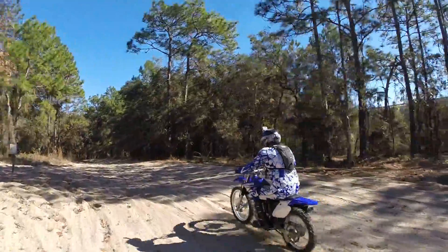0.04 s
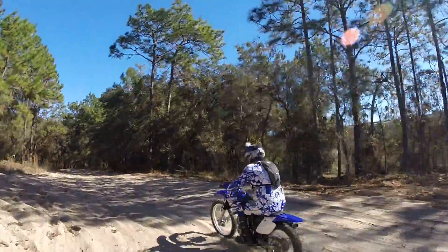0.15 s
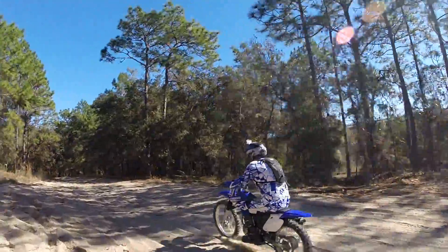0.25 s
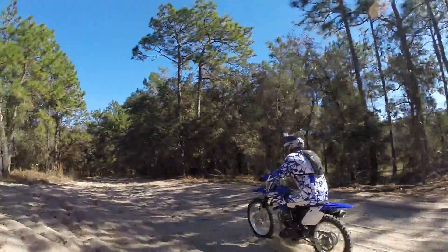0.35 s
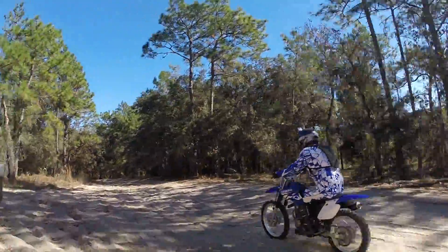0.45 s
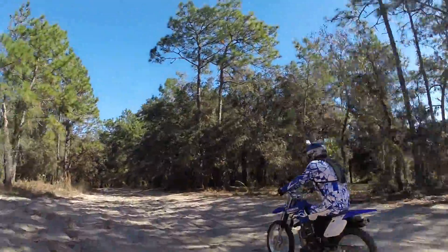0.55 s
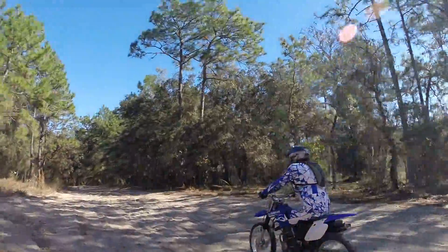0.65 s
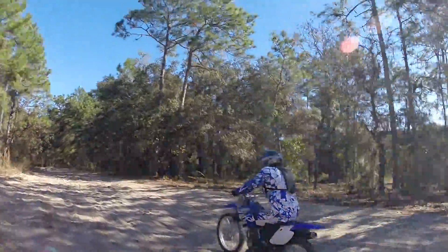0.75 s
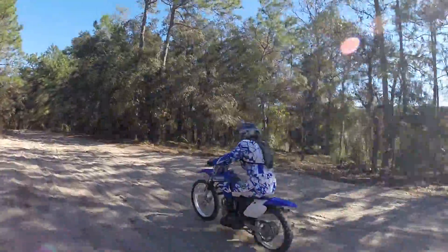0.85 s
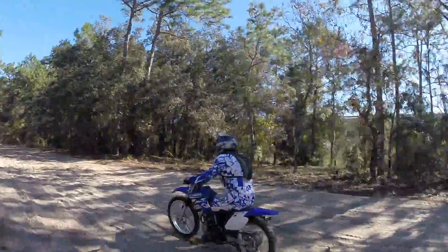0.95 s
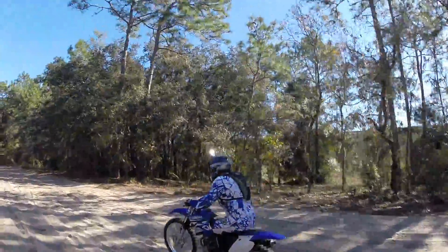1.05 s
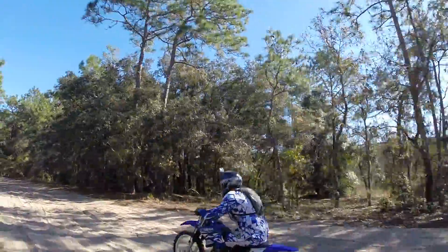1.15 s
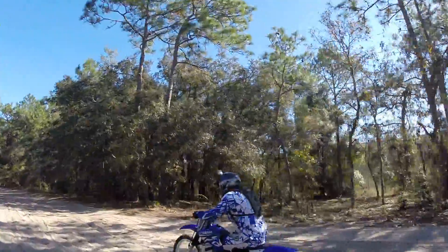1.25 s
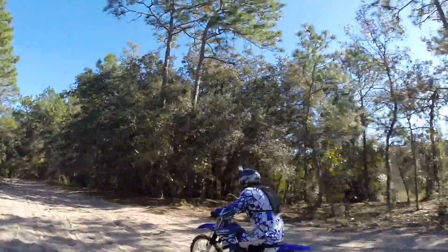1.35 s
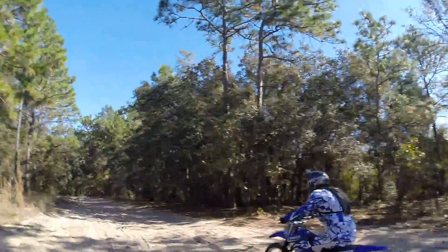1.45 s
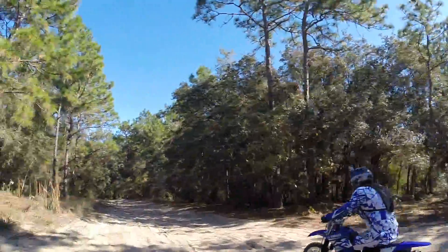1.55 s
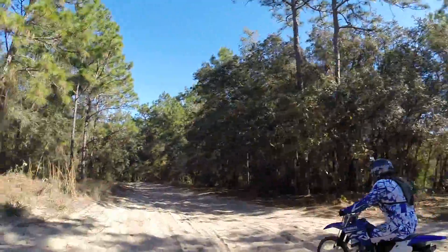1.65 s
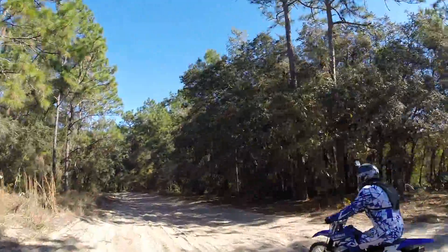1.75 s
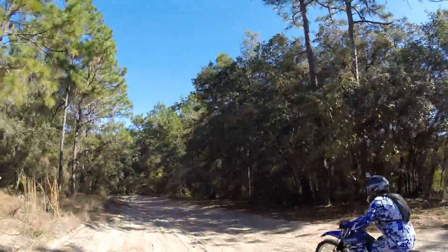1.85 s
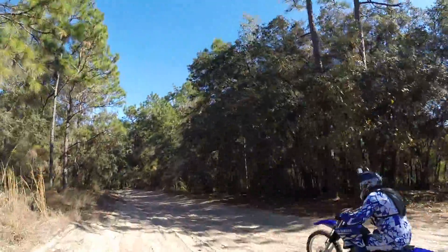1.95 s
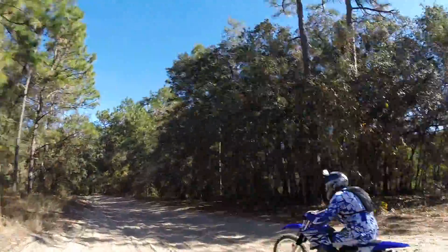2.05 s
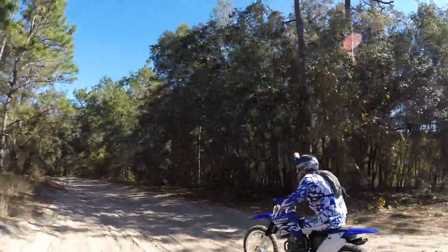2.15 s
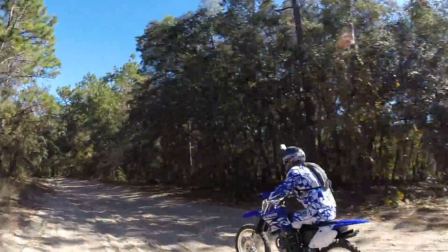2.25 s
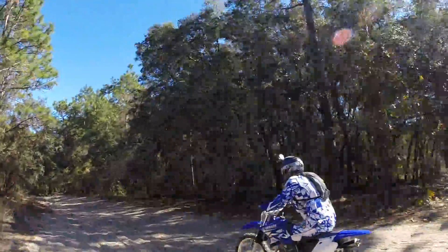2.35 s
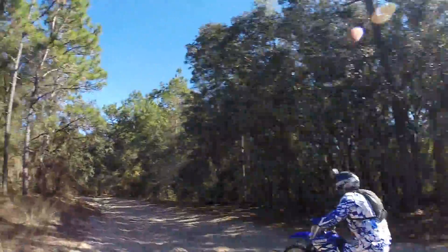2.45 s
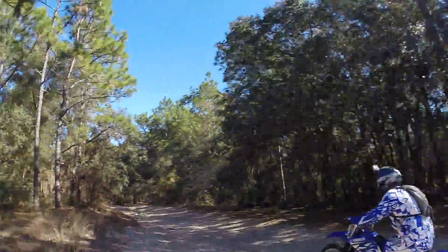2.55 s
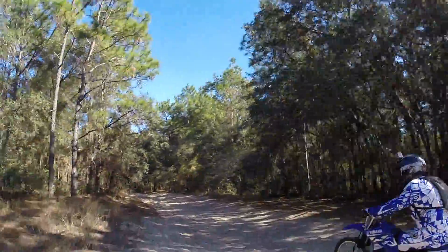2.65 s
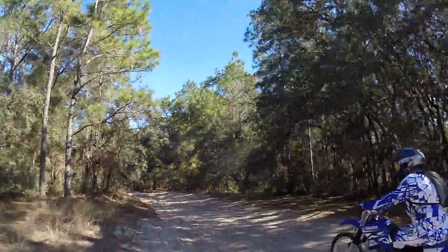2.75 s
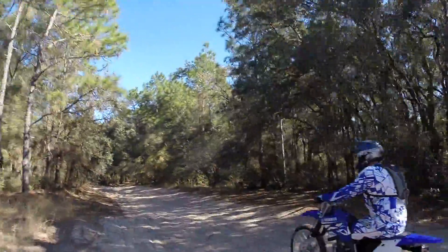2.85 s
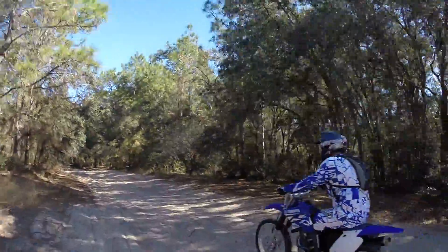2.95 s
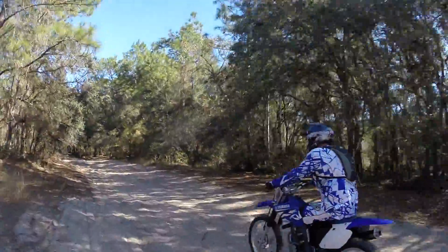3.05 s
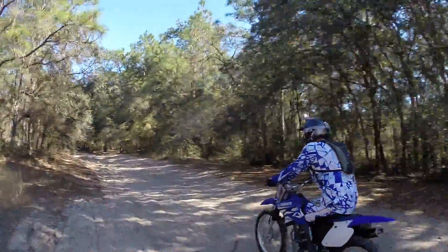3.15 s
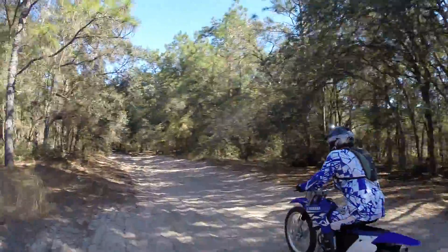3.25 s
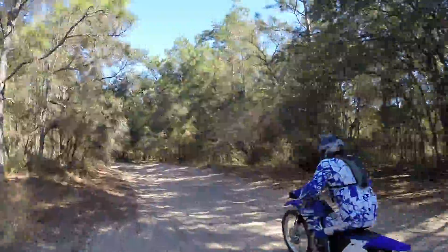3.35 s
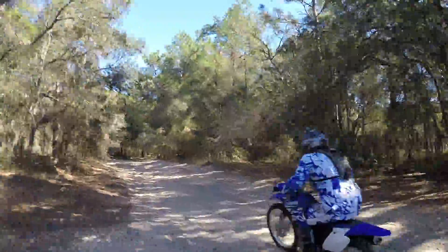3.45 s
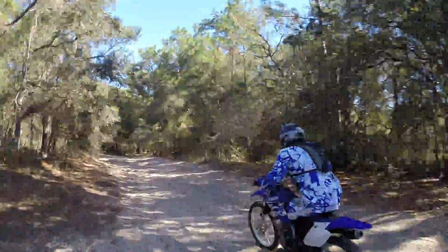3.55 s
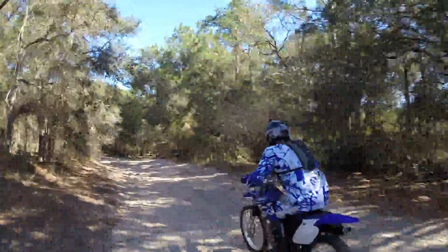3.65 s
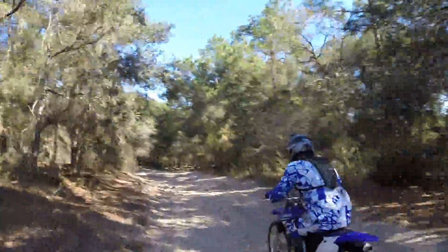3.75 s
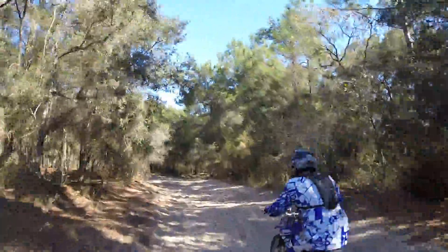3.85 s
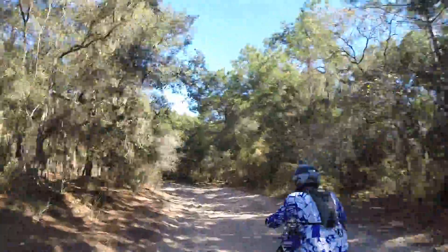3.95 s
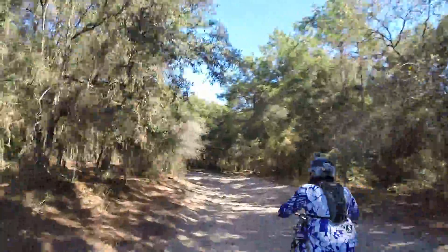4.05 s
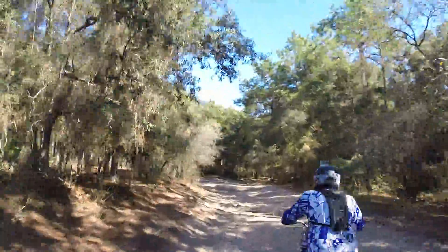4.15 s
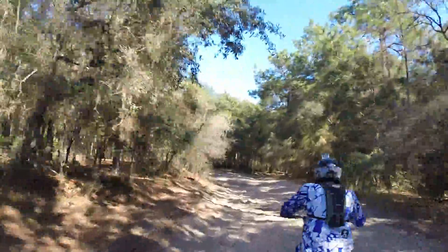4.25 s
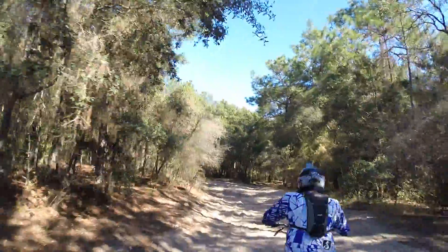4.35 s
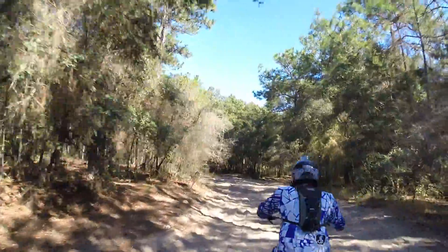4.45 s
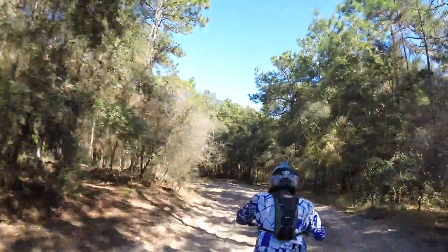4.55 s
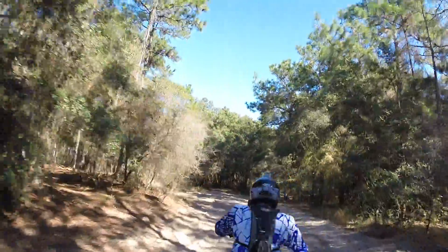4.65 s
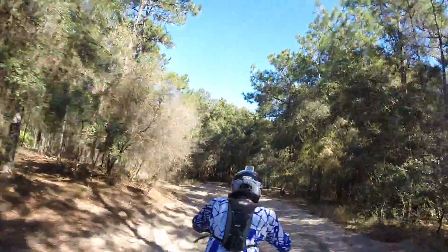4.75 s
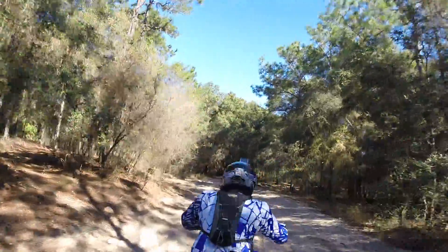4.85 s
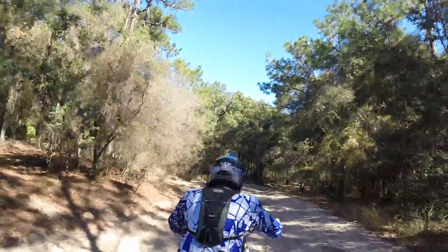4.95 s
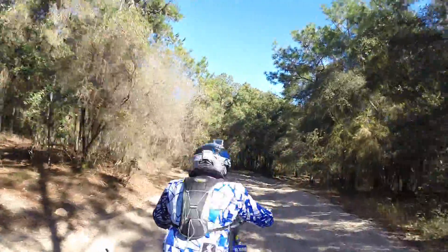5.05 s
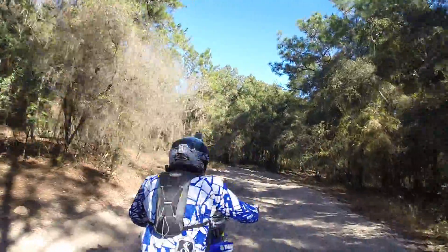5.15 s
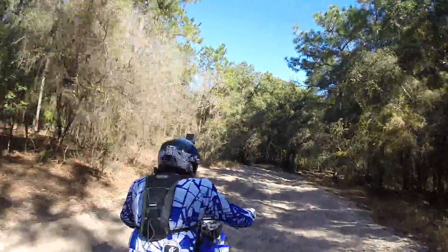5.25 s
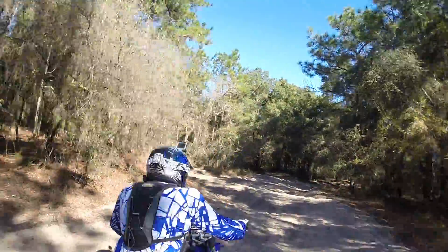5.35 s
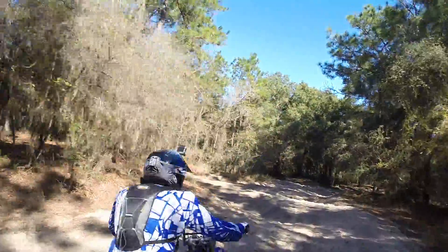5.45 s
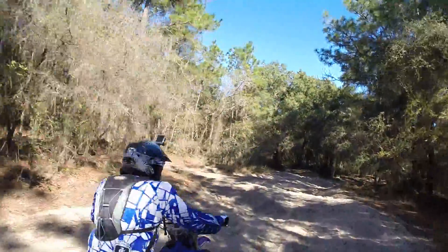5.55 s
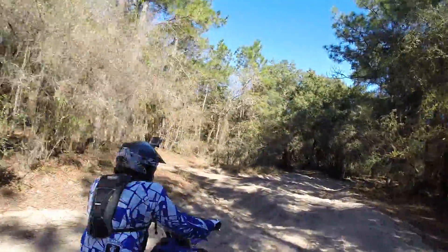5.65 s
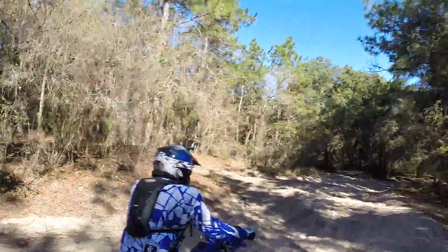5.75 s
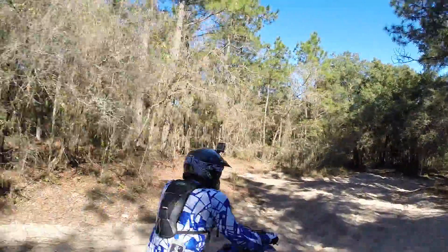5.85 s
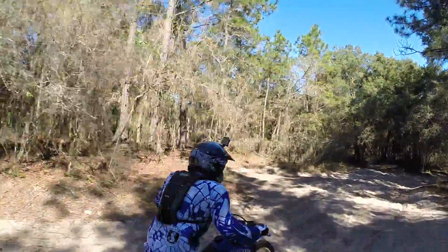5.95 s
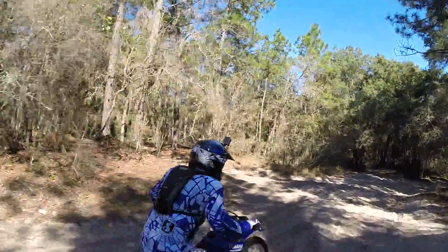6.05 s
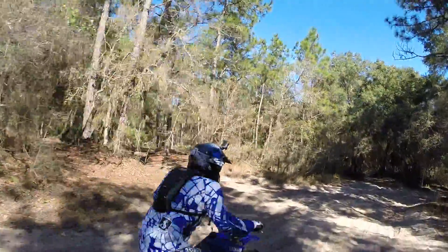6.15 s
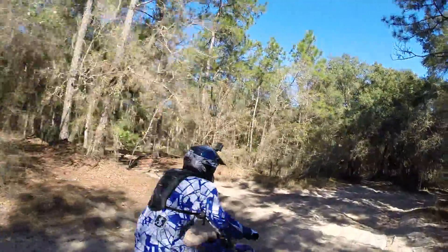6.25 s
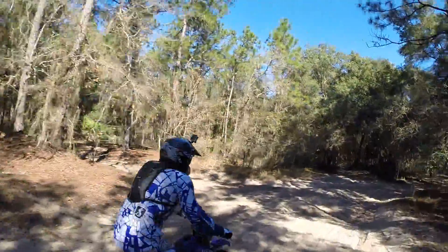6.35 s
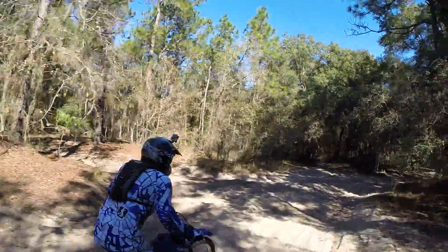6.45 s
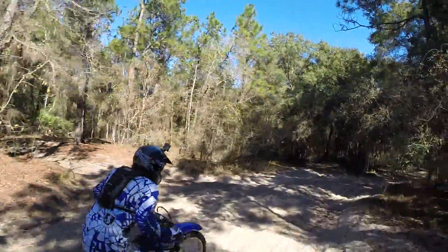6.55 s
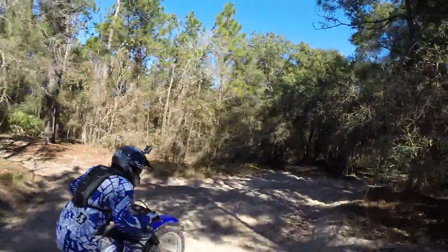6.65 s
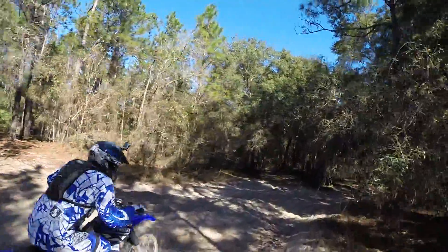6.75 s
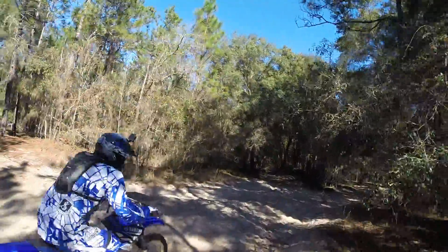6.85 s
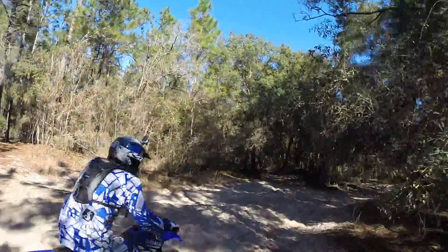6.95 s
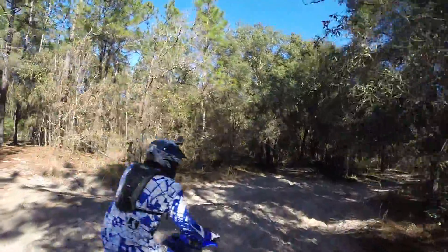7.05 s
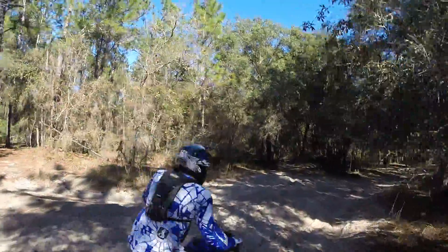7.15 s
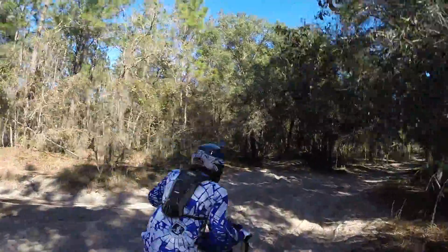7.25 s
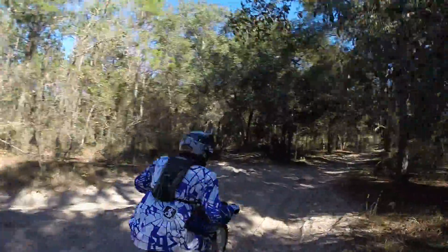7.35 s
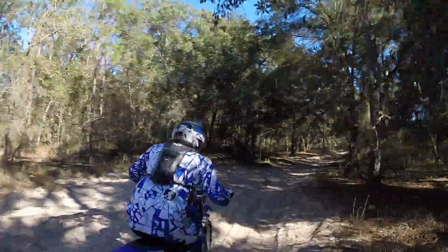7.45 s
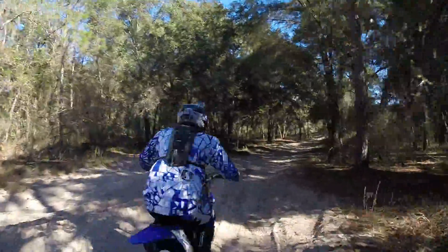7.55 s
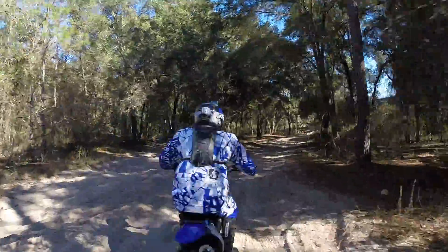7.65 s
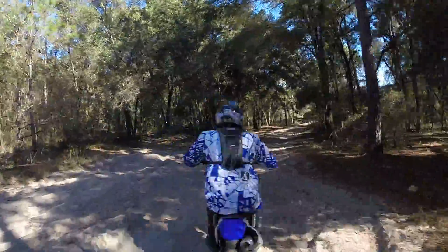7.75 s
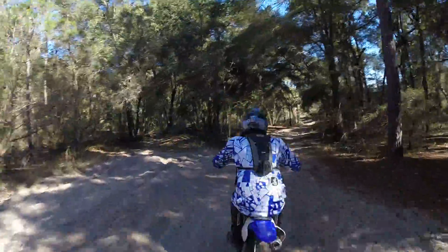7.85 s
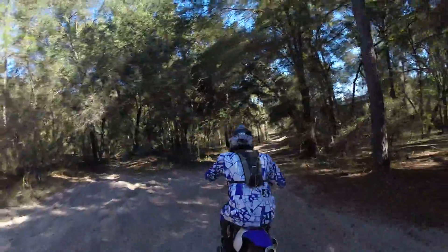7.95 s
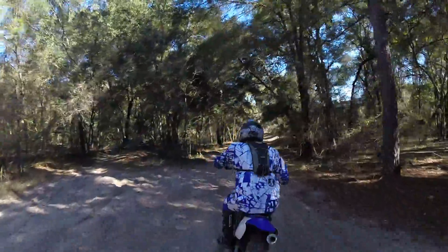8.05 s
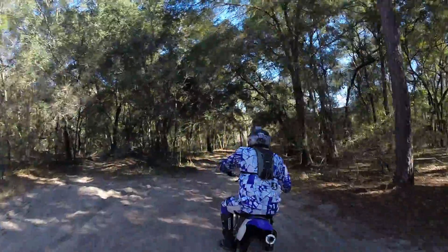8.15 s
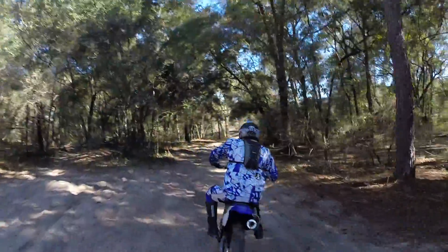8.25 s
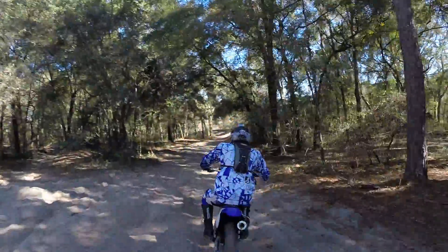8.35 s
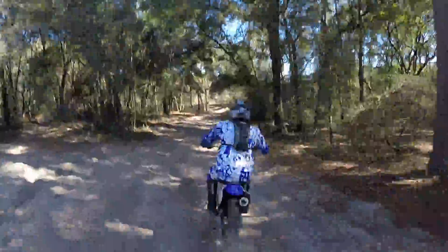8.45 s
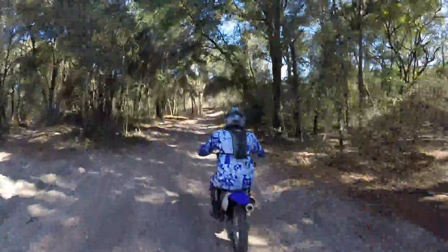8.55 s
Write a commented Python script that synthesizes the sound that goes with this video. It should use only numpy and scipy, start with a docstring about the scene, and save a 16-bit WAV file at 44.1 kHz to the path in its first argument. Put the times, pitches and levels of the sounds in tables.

```python
"""A helmet camera in its case rides a single-cylinder four-stroke dirt bike along a sandy trail.
It opens on two pulls of the throttle: each firing thumps the frame, booms in the silencer, growls and
barks, while the motor clatters and wind buffets the case. From 2.4 s the bike coasts and a second bike
drones faintly ahead. A third pull climbs from 3.5 to 4.8 s; then the revs sag, with two quick blips,
and the drone is back. The last pull starts at 7.4 s, with the hardest gust just after it."""
import sys
import numpy as np
from scipy import signal
from scipy.io import wavfile
from scipy.ndimage import uniform_filter1d

SR = 44100
rng = np.random.default_rng(int(sys.argv[2]) if len(sys.argv) > 2 else 0)


def store_pcm(level_fs):
    """Save levels as 16-bit WAV."""
    pcm = np.round(np.clip(level_fs, -1, 1) * 32767).astype(np.int16)
    wavfile.write(sys.argv[1], SR, np.atleast_2d(pcm).T)


N = 379687
T = np.arange(-SR // 10, N + SR // 10) / SR  # the engines run before time zero and past the end
M = len(T)
CRUISE_HZ = 35  # reference firing rate

# Engine speed, coasting and pull by pull. Each row: time in seconds, firing rate in Hz.
COAST_REVS = [(1.14, 35.77), (1.3, 35.54), (2.5, 35.03), (2.84, 31.22), (2.96, 36.33), (3.21, 32),
              (3.5, 29.02), (4.9, 39.42), (5.1, 33.44), (5.98, 31.3), (6.12, 34.08), (6.25, 33.23),
              (6.35, 34.9), (6.52, 29.52), (6.7, 28.02), (7.25, 26.82), (7.38, 25.64)]
PULL_REVS = [
    [(0.0, 41.52), (0.106, 41.9), (0.242, 43.6), (0.302, 44.65), (0.33, 43.5), (0.406, 42.2),
     (0.472, 42.12), (0.556, 42.7), (0.7, 42.9), (0.764, 41.7), (0.798, 41.6), (0.898, 42.05),
     (0.96, 40.53)],
    [(1.4, 35.63), (1.442, 37.15), (1.524, 40.57), (1.562, 42.3), (1.628, 42.47), (1.73, 41.76),
     (1.77, 41.84), (1.834, 43.68), (1.956, 45.15), (2.02, 45.2), (2.1, 47.86), (2.202, 43.68),
     (2.246, 43.83), (2.36, 42.1)],
    [(3.58, 34.12), (3.666, 34.87), (3.714, 35), (3.818, 34.54), (3.984, 39.32), (4.05, 42.05),
     (4.148, 42.5), (4.2, 43.68), (4.412, 45.25), (4.5, 44.46), (4.532, 44.47), (4.6, 45.98), (4.79, 46.43)],
    [(7.45, 28.23), (7.524, 30.51), (7.608, 32.49), (7.626, 32.9), (7.694, 32.39), (7.79, 33.63),
     (7.89, 32.5), (8.01, 35.16), (8.1, 38.36), (8.146, 38.7), (8.232, 37.6), (8.33, 38.1), (8.446, 37.34),
     (8.61, 40.1)],
]
# Long throttle pulls, a list each. Each row: time in seconds, then boom, bark and clatter in dB.
PULLS = [
    [(0.0, -16, -29.5, -32), (0.034, -15, -27.5, -26.5), (0.294, -30.5, -48, -26), (0.352, -17, -30, -25.5),
     (0.386, -19, -37, -27), (0.586, -18, -32, -25.5), (0.68, -26, -47, -26.5), (0.72, -27.5, -27, -25),
     (0.782, -30, -51, -26), (0.91, -21, -30, -25), (0.97, -39, -47, -28.5)],
    [(1.34, -25, -44, -40), (1.37, -26.5, -44, -38), (1.4, -20, -33.5, -28), (1.456, -16, -29, -40),
     (1.566, -12, -28.5, -26), (1.612, -20, -27.5, -31), (1.914, -20, -21.5, -34), (1.942, -21, -23.5, -27),
     (2.188, -17, -25.5, -24.5), (2.346, -28, -38, -28.5), (2.38, -45, -50, -36)],
    [(3.54, -35, -57, -52), (3.554, -24, -35, -32), (3.58, -23.5, -34, -31.5), (3.636, -15, -25, -29.5),
     (3.77, -11.5, -26.5, -30.5), (3.966, -13, -26, -30), (4.33, -19, -25, -27.5), (4.434, -17, -21, -33),
     (4.602, -19.5, -23.5, -32), (4.67, -17, -20, -28), (4.736, -16, -23.5, -24.5), (4.78, -24, -15, -31),
     (4.8, -45, -51, -31)],
    [(7.4, -36, -52, -47), (7.432, -27, -33, -30), (7.45, -21, -37, -48), (7.462, -24.5, -27.5, -33.5),
     (7.678, -20, -28.5, -28.5), (7.82, -18.5, -22.5, -29.5), (7.866, -18.5, -27, -31),
     (8.082, -9.5, -26.5, -30.5), (8.096, -10.5, -24.5, -28), (8.456, -12.5, -29, -38),
     (8.61, -8, -26.5, -39)],
]
# Throttle blips. Each row: start and hold in seconds, then boom, bark and clatter in dB.
BLIPS = [(1.184, 0.079, -25.5, -27.5, -31), (2.898, 0.091, -19.5, -26, -29.5),
         (6.075, 0.074, -26.5, -36, -31.5), (6.289, 0.093, -24, -30, -32)]
# The resonances that voice each layer. Each row: pitch in Hz, width in Hz, relative level in dB.
SILENCER_MODES = [(228.5, 25.7, 5), (261.1, 33.8, 7.5), (314, 40, 7), (350, 110, -34), (411.2, 32, -6.5),
                  (449, 23.4, -15), (494, 68, -17.5)]
BARK_MODES = [(1191.5, 45, -1.5), (1315.6, 77, 1), (1575, 250, -7), (1820, 310, -5.5), (2027, 135, -9),
              (2300, 300, 0.5)]
GROWL_MODES = [(536, 190, 3.9), (631, 150, 5.4), (769, 175, 5.9), (896, 43, 0.53), (1019, 76, 3.8)]
FRAME_MODES = [(39.3, 14, -4), (71.4, 43, -3.5), (121.5, 34, 4.5), (182.6, 45, -10)]
CASE_MODES = [(800, 530, -5.5), (1266, 390, 0), (1575, 190, -2.5), (1745, 115, -2.5), (2230, 610, 4),
              (2560, 600, -1), (2892, 133, 2.5), (3053, 150, 1), (3461, 440, 1.5), (4662, 380, -7.5),
              (5710, 780, -4), (7050, 1380, -9), (8200, 1000, -14.5), (9900, 1400, -17.5),
              (12700, 3000, -22.5)]
TICK_MODES = [(9200, 460, 0), (10350, 550, 2.5), (11450, 760, 0.5), (12400, 900, -0.5), (13700, 900, -8)]
AHEAD_PIPE_MODES = [(183, 21, -25), (333, 58, -6), (341.7, 27.5, 3), (524, 74, -18)]
AHEAD_RASP_MODES = [(2430, 690, 10), (2930, 310, 6.5), (7060, 1700, 0.5), (12000, 4000, -44)]
# Exhaust colour as load and the rider's head change. Each row: time in seconds, lifts of upper boom,
# growl and upper bark in dB, noise in the boom as a share of its pulses.
PIPE_COLOUR = [(0, 0, -2, 1, 0.26), (.25, 4, 9, 12, 0.42), (.4, 0.5, 1, 7.5, 0.24), (.65, 3, 1, -1, 0.3),
               (.8, 8, 6.5, 3, 0.37), (.95, 7, 5.5, 0, 0.23), (1.25, 8, 7.5, -1, 0.37),
               (1.45, -1.5, 3.5, -0.5, 0), (1.7, 7, 0, 0, 0.17), (1.9, 3, 6.5, -1, 0.42),
               (2.1, 4, 3, -0.5, 0.29), (2.35, 2.5, 6, 3.5, 0.44), (2.95, 0.5, 5.5, -6, 0.15),
               (3.6, 1.5, 0, -6, 0), (3.85, -6, -2, -9, 0.04), (4.05, 2.5, -0.5, -4.5, 0.26),
               (4.3, 3.5, 1, 0.5, 0.08), (4.55, 1, 1.5, -1, 0.11), (4.8, 7.5, 0.5, -5, 0.24),
               (6.2, 4.5, 3, -6, 0), (7.45, 4.5, 7.5, -1.5, 0.11), (7.8, 6.5, 3, -4, 0.14),
               (8.1, -8.5, -0.5, -2, 0.13), (8.35, -2.5, -3, -1.5, 0.11), (8.61, -3, -3.5, -3, 0.06)]
# The weaker boom that comes first. Each row: time in seconds, share of the main boom.
EARLY_BOOM = [(0, 0.51), (.9, 0.48), (1.4, 0.61), (1.9, 0.74), (2.4, .5), (3.6, .45), (3.9, 0.7),
              (4.2, 0.63), (4.8, 0.53), (7.4, 0.42), (7.9, 0.265), (8.1, 0.72), (8.61, 0.65)]
# Weight of the silencer's lowest note. Each row: time in seconds, lift in dB.
LOW_BOOM = [(0, 4.5), (.3, 2.5), (.6, 1.5), (.95, 6), (1.4, -4.5), (1.8, -3.5), (2.0, -0.5), (2.1, 8),
            (2.2, 2), (2.4, -3.5), (3.6, 1.5), (4.0, -3), (4.3, -5.5), (4.8, 0), (6.2, -1), (7.45, 2.5),
            (7.8, 4), (8.1, -3.5), (8.61, -8)]
# How cleanly the bark stops between firings. Each row: time in seconds, depth of the dip from 0 to 1.
BARK_CRISPNESS = [(0, .35), (.8, .4), (1.2, .7), (1.9, .6), (2.3, .4), (2.9, .7), (4.1, .6), (4.8, .75),
                  (7.9, .6), (8.2, .4), (8.61, .2)]
# Echoes between the silencer's baffles. Each entry: delay in seconds.
BAFFLE_DELAYS = (0.00166, .0029, .0047)
# Slow drift of the thump. Each row: time in seconds, trim in dB, lift of its top note in dB.
THUMP_DRIFT = [(0, -0.5, 15), (1, 0.5, 12), (2, -1.5, 13), (3, 2.5, -1), (4, 0, -1), (4.6, -3, -5),
               (5.1, 6.5, -1), (5.8, 3.5, -1), (6.6, -0.5, -2), (7.3, 0, -4), (7.8, 0, -29), (8.61, 1, -13)]
# The bike ahead, a list per stretch. Each row: time in seconds, firing rate in Hz, pipe level in dB.
AHEAD_DRONE = [
    [(2.35, 42.3, -49), (2.58, 38.68, -43.5), (3.0, 42.8, -40.5), (3.18, 41.68, -52), (3.37, 44.12, -40.5),
     (3.6, 42.1, -43)],
    [(4.8, 40.76, -59), (4.98, 38.45, -41), (5.4, 38.2, -40), (5.6, 37, -40), (5.87, 36.62, -39.5),
     (6.05, 39.2, -41), (6.24, 36.87, -39), (6.56, 39.07, -45.5), (6.74, 37.3, -40), (7.18, 41, -39.5),
     (7.3, 40.74, -42.5), (7.45, 37.54, -36)],
]
# Wind on the case: gust peaks, and the breeze under them. Each row: time in seconds, level in dB.
GUSTS = [(0.141, -25), (0.319, -31), (0.741, -32), (.89, -29), (1.27, -22), (1.48, -32.5), (2.392, -28),
         (5.5, -31), (6.47, -27), (7.41, -36), (7.61, -14), (7.89, -30), (8.15, -36)]
BREEZE = [(0, -29), (1.3, -29), (1.68, -32), (1.9, -31), (2.35, -24.5), (2.8, -49), (3.7, -31.5),
          (4.0, -52), (5.2, -32), (6.8, -40), (8.61, -43)]
# Tone of the wind's rush. Each row: frequency in Hz, relative spectral density in dB.
RUSH_TONE = [(35, -36), (60, 1.5), (120, 2), (224, -11.5), (332, -6), (591, -20.5), (2980, -32),
             (4020, -22.5), (15000, -49)]


def own_bike():
    """The lead voice: exhaust, frame and motor layers, all timed by one crank."""
    hz = curve(sorted(COAST_REVS + sum(PULL_REVS, [])))
    boom_on, bark_on, clatter_on = throttle()
    load = (boom_on / undb(-14)) ** .73  # 1 at full load; follows the boom only in part
    pulses, phase, strength = firings(hz, waver=.003, scatter_db=.97)
    pulses = pulses / np.sqrt(hz)  # same power at any speed
    puff = strength * phase / .09 * np.exp(1 - phase / .09)  # gas swells and fades as the valve opens
    noise = rng.standard_normal((5, M))
    out = (boom_on + rev_gain(hz, -37, .74)) * boom(pulses, phase, hz, noise[0])
    out += (bark_on + rev_gain(hz, -50.5, .16)) * bark(pulses, phase, hz, noise[2] * (puff + .12))
    growl_gain = load * rev_gain(hz, -31.5, .44) + rev_gain(hz, -49.5, .71)
    out += growl_gain * growl(pulses, noise[1] * (puff + .8))
    out += np.maximum(clatter_on, rev_gain(hz, -33.5, .58)) * clatter(puff, phase, noise[4])
    out += (rev_gain(hz, -32.5, .29) + load * undb(-38)) * thump(pulses, noise[3])
    return out + (1 + .37 * load) * ticks(phase, db=-60, per_cycle=2)


def throttle(open_s=.02, shut_s=.023, bark_lag_s=.02):
    """The open throttle rides three faders: boom, bark and clatter. On a blip the boom leads."""
    def gate(start, end):
        return np.clip(np.minimum((T - start) / open_s, 1 + (end - T) / shut_s), 0, 1)

    gains = 0
    for k, pull in enumerate(PULLS):
        start = pull[0][0] if k else T[0]  # the first pull is already under way
        gains += gate(start, pull[-1][0]) * undb([curve(pull, column) for column in (1, 2, 3)])
    for start, held, *levels in BLIPS:
        early, late = gate(start, start + held), gate(start + bark_lag_s, start + held)
        gains += np.array([early, late, late]) * undb(levels)[:, None]
    return gains


def firings(hz, waver, scatter_db):
    """A cylinder firing: one pulse a cycle, the phase from 0 to 1, and each cycle's own strength."""
    cycles = np.cumsum(hz * (1 + waver * wander(25))) / SR
    strength = undb(scatter_db * rng.standard_normal(1000))[cycles.astype(int)]
    return np.diff(np.floor(cycles), prepend=0) * strength, cycles % 1, strength


def boom(pulses, phase, hz, noise, pipe_s=.0107, choke_lag_s=.002, choke_s=.0025):
    """The silencer booms weakly, then fully after the long pipe; the opening valve briefly chokes it."""
    pair = curve(EARLY_BOOM) * pulses + delay(pulses, pipe_s)
    drive = unit(pair) + curve(PIPE_COLOUR, 4) * noise
    body = ring(drive, SILENCER_MODES, high_db=curve(PIPE_COLOUR, 1), above_hz=290,
                low_db=curve(LOW_BOOM), below_hz=248)
    since, until = phase / hz, (1 - phase) / hz  # seconds after and before a firing
    from_choke = np.minimum(abs(since - choke_lag_s), until + choke_lag_s)
    return unit(body * (1 - .65 * np.exp(-(from_choke / choke_s) ** 2)))


def bark(pulses, phase, hz, gas, echo_s=.0078, hold_s=.016, lead_s=.001):
    """The exhaust's bright edge: an uneven double hit that leaves the pipe before the boom."""
    uneven = pulses * undb(1.5 * wander(40))
    pair = uneven + .85 * delay(uneven, echo_s)
    blur = .55 * (CRUISE_HZ / hz) ** 2.5  # cleaner at high revs
    drive = unit(baffles(pair, gain=.75)) + blur * unit(gas)
    tone = ring(drive, BARK_MODES, snap=2, high_db=curve(PIPE_COLOUR, 3), above_hz=1450)
    dip = curve(BARK_CRISPNESS) * np.clip(phase / hz / hold_s - .5, 0, 1)
    return unit(delay(tone * (1 - dip), -lead_s))


def growl(pulses, gas, echo_s=.00625, lead_s=.002):
    """The exhaust's gritty mids: a crack bounces along the pipe, weaker each time, over gas noise."""
    cracks = sum(.6 ** k * delay(pulses, k * echo_s) for k in range(3))
    tone = ring(unit(cracks) + .45 * unit(gas), GROWL_MODES, snap=2)
    return unit(delay(undb(curve(PIPE_COLOUR, 2)) * tone, -lead_s))


def baffles(x, gain):
    """All-pass echoes between the baffles smear a pulse into a short burst."""
    for lag in BAFFLE_DELAYS:
        k = int(lag * SR)
        rows = np.pad(x, (0, -M % k)).reshape(-1, k)  # one echo time to a row
        x = signal.lfilter([-gain, 1], [1, -gain], rows, axis=0).ravel()[:M]
    return x


def thump(pulses, noise):
    """The low end: each firing thumps the frame, over a little rumble."""
    hits = ring(baffles(pulses, gain=.4), FRAME_MODES, high_db=curve(THUMP_DRIFT, 2), above_hz=150)
    rumble = .2 * ring(noise, FRAME_MODES)
    return undb(1.5 * wander(15) + curve(THUMP_DRIFT)) * unit(hits + rumble)


def clatter(puff, phase, noise, floor=1.7):
    """Valve gear and piston knock once a firing and, weaker, a turn later; the case colours them."""
    knocks = puff + .5 * np.exp(-((phase + .5) % 1) / .24) + floor
    return ring(noise * knocks * undb(.93 * wander(20)), CASE_MODES)


def ticks(phase, db, per_cycle, decay_s=.003, scatter_db=4):
    """Valve gear ticks thinly in the treble; each tick rings its own mix of small parts."""
    onsets = np.diff((per_cycle * phase + .3) % 1, prepend=0) < -.5
    chance = rng.standard_normal((1000, len(TICK_MODES)))
    noise = rng.standard_normal(M)
    drift = wander(7.8)
    out = 0
    for k, (hz, width, mode_db) in enumerate(TICK_MODES):
        hits = onsets * undb(scatter_db * (chance[np.cumsum(onsets), k] + .5 * drift))
        grains = noise * signal.lfilter([1], [1, -np.exp(-1 / (decay_s * SR))], hits)
        out += undb(mode_db) * ring(grains, [(hz, width, 0)])
    return undb(db) * unit(out)


def bike_ahead(fade_s=.034):
    """Steady firings drone through a distant pipe, each with a rasp of gas and a faint tick."""
    out = 0
    for stretch in AHEAD_DRONE:
        pulses, phase, strength = firings(curve(stretch), waver=.00846, scatter_db=.34)
        gas = rng.standard_normal(M) * strength * np.exp(-phase / .41)
        exhaust = ring(pulses, AHEAD_PIPE_MODES) + undb(-1) * ring(gas, AHEAD_RASP_MODES)
        fade = np.clip(np.minimum(T - stretch[0][0], stretch[-1][0] - T) / fade_s, 0, 1)
        out += fade * (undb(curve(stretch, 2)) * exhaust + ticks(phase, db=-73, per_cycle=1))
    return out


def wind(gust_s=.047, rush_db=-33):
    """Sub-bass buffets on the case, and a broad rush whose half-octave bands each flicker alone."""
    sub_band = signal.butter(3, [8, 22], "band", fs=SR, output="sos")
    buffet = unit(signal.sosfilt(sub_band, rng.standard_normal(M)))
    hz, db = np.transpose(RUSH_TONE)
    rush = 0
    for centre in 70 * 2 ** np.arange(0, 7.7, .5):
        band = ring(rng.standard_normal(M), [(centre, centre / 1.74, 0)])
        band_db = np.interp(np.log(centre), np.log(hz), db) + 2.7 * wander(9.9)
        rush += band * undb(band_db) * np.sqrt(centre)
    gusts = sum(undb(peak_db) * np.exp(-((T - s) / gust_s) ** 2) for s, peak_db in GUSTS)
    return (gusts + undb(curve(BREEZE))) * buffet + undb(rush_db) * unit(rush)


def ring(x, modes, snap=1, high_db=0, above_hz=0, low_db=0, below_hz=0):
    """Resonators of alternating sign, two passes each; snap widens the first for a quicker attack."""
    out = 0
    for k, (hz, width, db) in enumerate(modes):
        y = x
        for widen in (snap, snap ** -.3):
            y = signal.lfilter(*signal.iirpeak(hz, hz / width / widen, fs=SR), y)
        gain = undb(db + high_db * (hz > above_hz) + low_db * (hz < below_hz))
        out += (-1) ** k * gain * unit(y)
    return unit(out)


def wander(rate):
    """Random modulation: levels held 1 / rate seconds and slewed twice, at RMS 1."""
    k = int(SR / rate)
    steps = np.repeat(rng.standard_normal(M // k + 1), k)
    return unit(uniform_filter1d(uniform_filter1d(steps, k), k)[:M])


def rev_gain(hz, cruise_db, db_per_hz):
    """Gain that climbs with the firing rate."""
    return undb(cruise_db + db_per_hz * (hz - CRUISE_HZ))


def curve(table, column=1):
    """Automation lane: one column of a table, joined by straight lines in time."""
    columns = np.transpose(table)
    return np.interp(T, columns[0], columns[column])


def delay(x, seconds):
    """Slide later, or earlier if negative, wrapping round."""
    return np.roll(x, int(seconds * SR))


def undb(db):
    """Decibels to gain."""
    return 10 ** (np.asarray(db) / 20)


def unit(x):
    """Scale to RMS 1."""
    return x / np.sqrt(np.mean(x ** 2))


def scene():
    """Both bikes and the wind in mono, run-in and run-out trimmed."""
    return (own_bike() + bike_ahead() + wind())[None, SR // 10:SR // 10 + N]


def record(dry):
    """The camera cuts the top above 15150 Hz."""
    return signal.sosfilt(signal.ellip(10, .2, 80, 15150, fs=SR, output="sos"), dry)


dry = scene()
out = record(dry)
store_pcm(out)
```